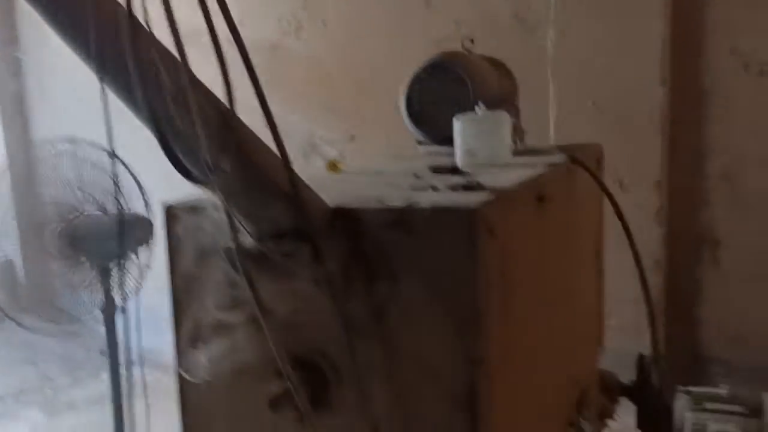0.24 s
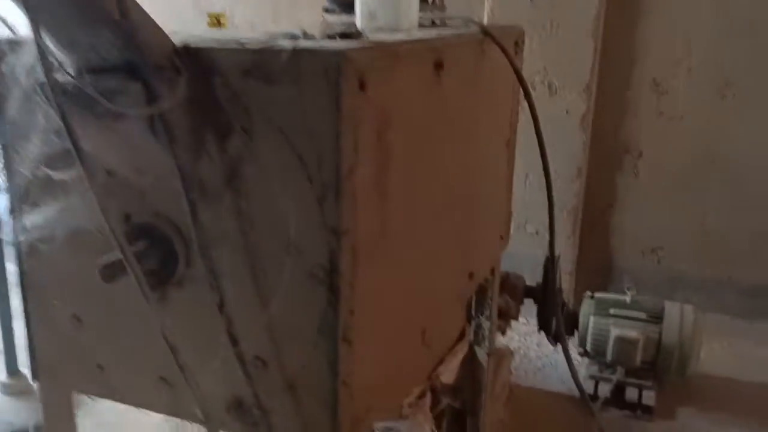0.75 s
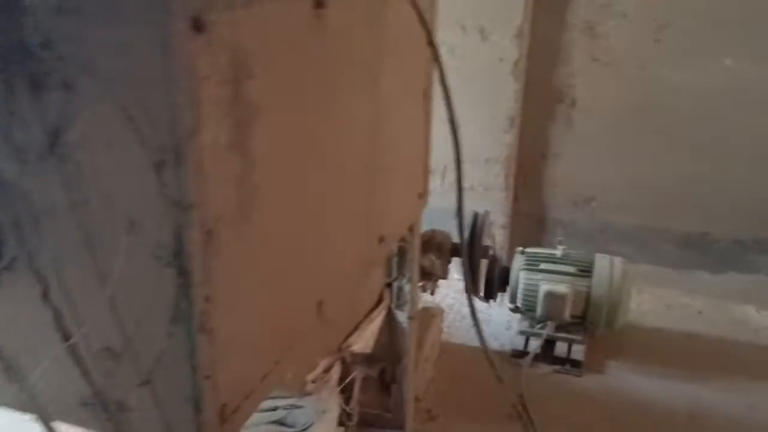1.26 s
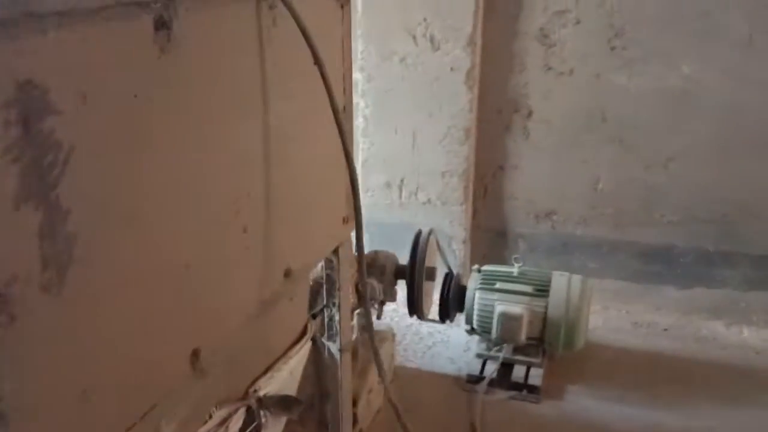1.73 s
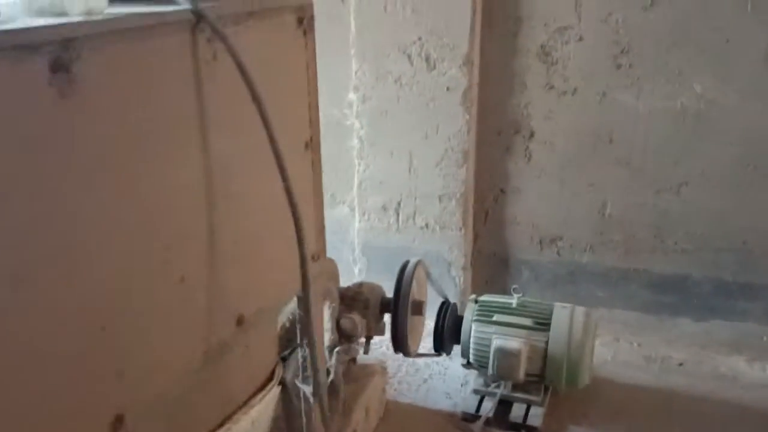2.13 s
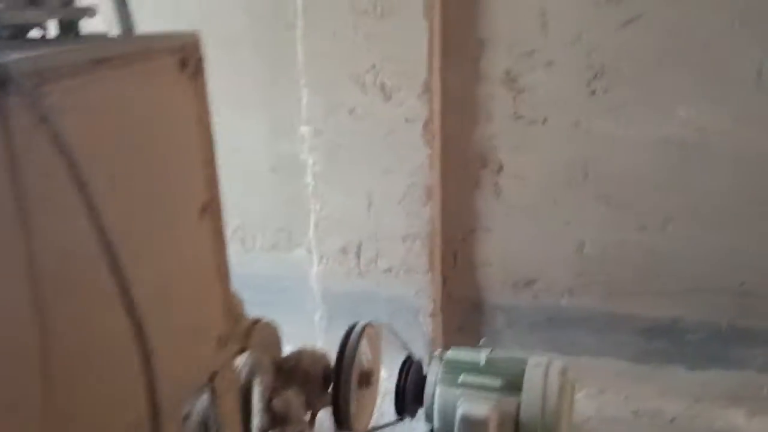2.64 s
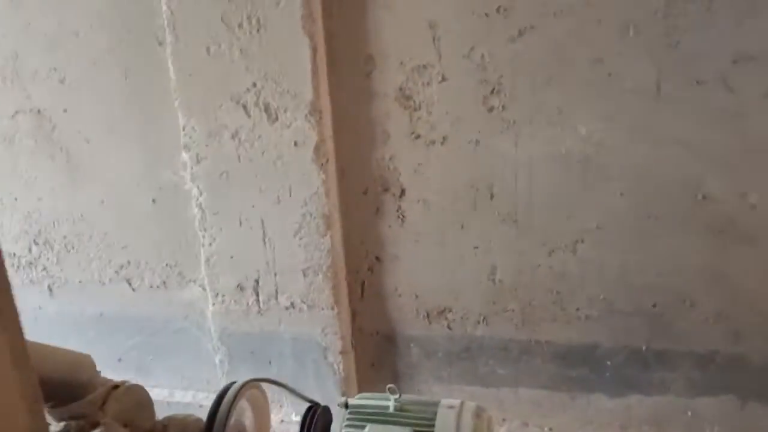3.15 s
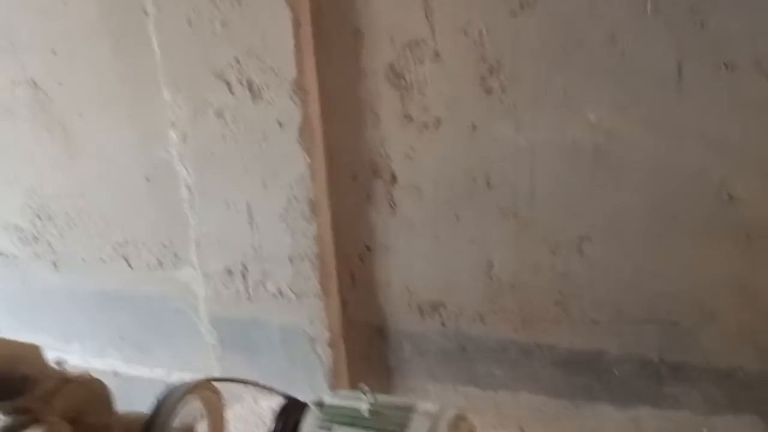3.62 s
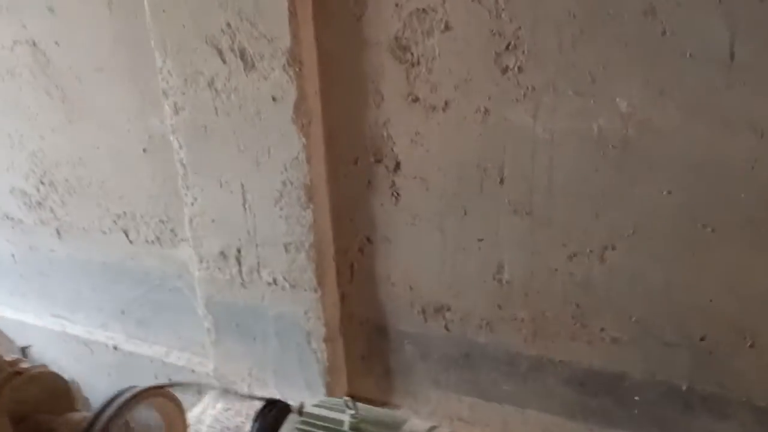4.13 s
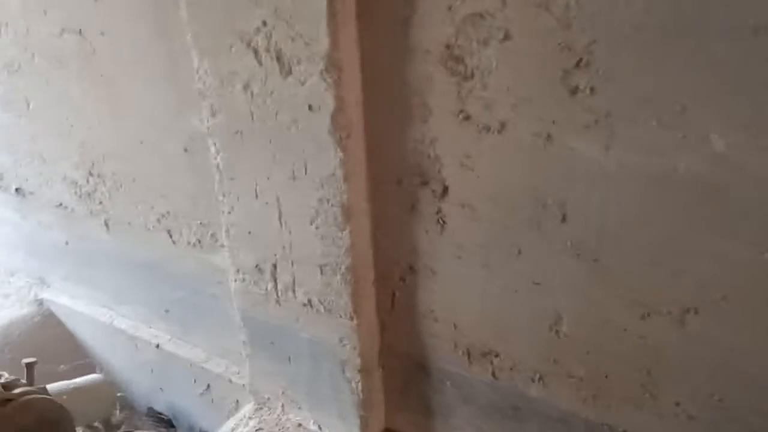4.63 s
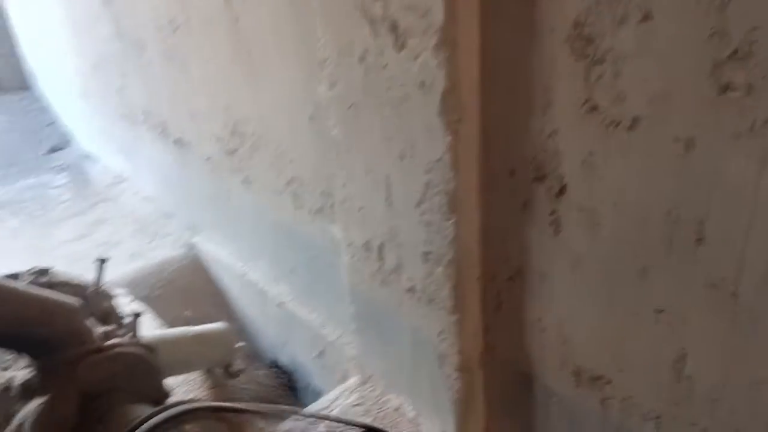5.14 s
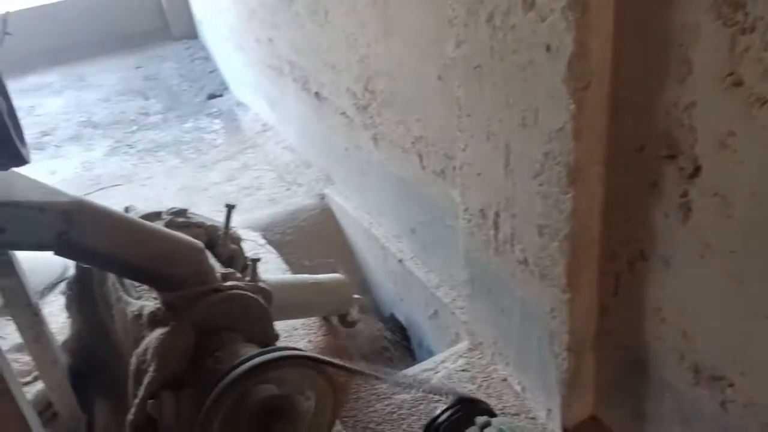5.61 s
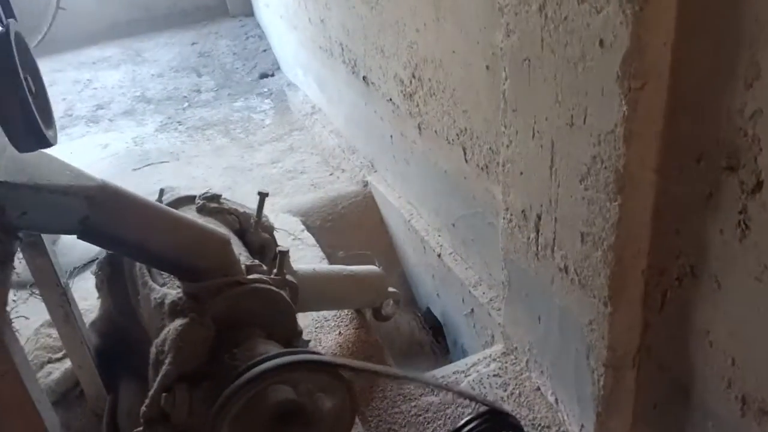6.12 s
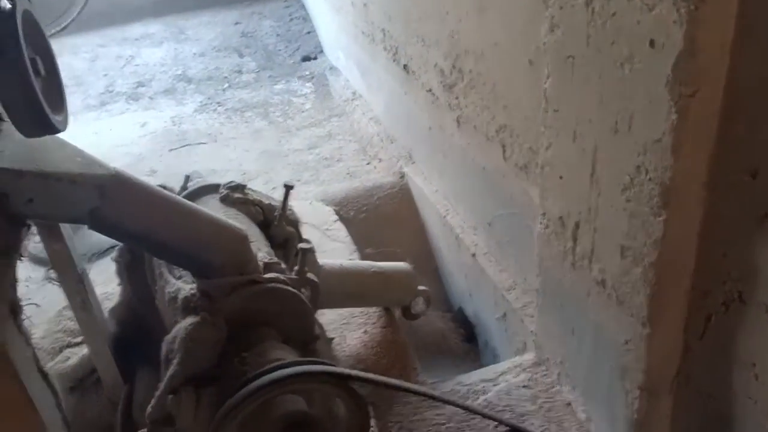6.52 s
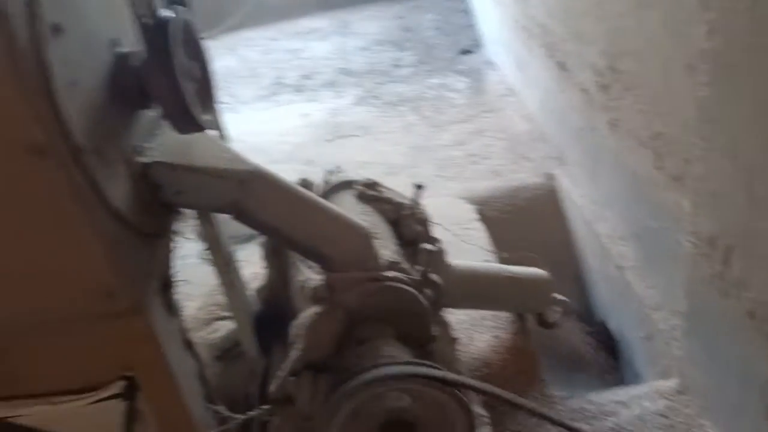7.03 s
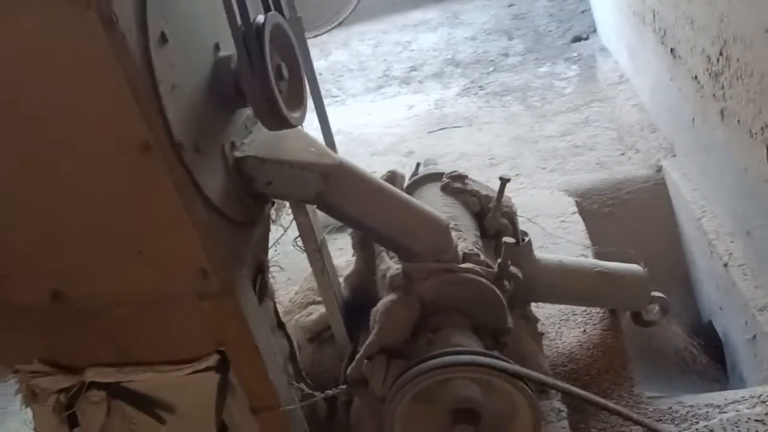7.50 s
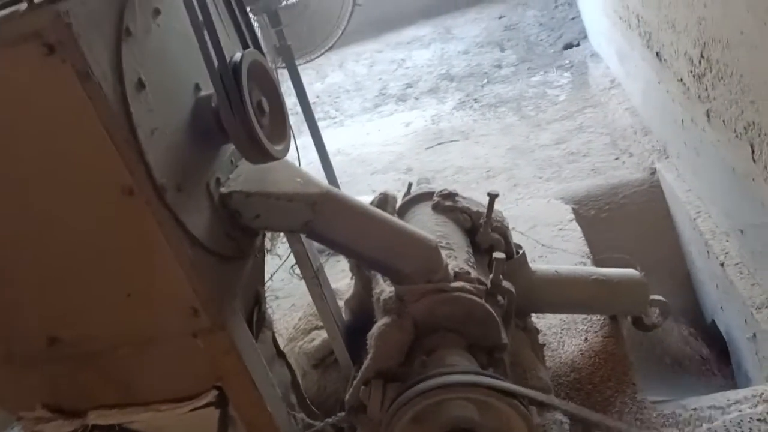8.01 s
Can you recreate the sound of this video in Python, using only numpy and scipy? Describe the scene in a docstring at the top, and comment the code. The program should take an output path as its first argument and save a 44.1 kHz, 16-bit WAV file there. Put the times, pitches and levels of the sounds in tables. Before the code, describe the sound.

A small grain mill runs steadily in a concrete workshop, a loud bright dense hiss over low belt rumble and a faint motor whine.

```python
"""Small grain mill in a concrete workshop

Grain sheared between the plates makes a dense bright hiss: noise and random cracks, coloured by each
microphone port, throbbing with the shaft. Below it frame, drum and belts rumble as low noise; drum, gears
and bearings hum as narrow noise, and the motor whines faintly as a sine. A hand turns the microphone pair slowly.
"""
import sys
import numpy as np
from scipy import signal
from scipy.fft import rfft, irfft, next_fast_len
from scipy.io import wavfile

SR = 44100
rng = np.random.default_rng(int(sys.argv[2]) if len(sys.argv) > 2 else 0)


def pcm_store(signal):
    """Save signal as 16-bit PCM."""
    levels = np.round(np.clip(np.atleast_2d(signal), -1, 1) * 32767)
    wavfile.write(sys.argv[1], SR, levels.astype(np.int16).T)


def ratio(d):
    """dB to gain"""
    e = np.asarray(d, float) / 20
    return 10 ** e


N = 364266

# Hand holding the microphone pair. Each row: time in seconds, nearness to the mill in dB,
# tilt of the left port in dB, opening of the left port in dB.
HAND = [(0.0, 0.9, 1, -2.4), (.4, -0.1, 0.3, -1), (1.0, -0.7, -2, -0.3), (1.5, 0.1, -3, -0.5),
        (2.2, 1.2, 0, 1.9), (2.8, 0.8, -0.5, -1.2), (3.4, 1.3, -.3, .7), (4.0, 0.6, -0.5, -1.5),
        (4.5, 1, .4, -.6), (5.0, 0, 1.3, -0.8), (6.1, -0.85, 1.5, 1), (6.8, -0.5, 0.5, 1.5),
        (7.4, -1.5, 0.1, 0), (8.26, -1.1, .3, 2)]


def rms_one(x):
    """Scale each channel to rms 1."""
    return x / np.sqrt(np.mean(x ** 2, axis=-1, keepdims=True) + 1e-20)


def in_time(rows):
    """Columns of a curve table, one value a sample."""
    time_s, *columns = np.transpose(rows)
    return [np.interp(np.arange(N) / SR, time_s, column) for column in columns]


def bumps(rows):
    """Bell-shaped swells and dips, in dB."""
    t = np.arange(N) / SR
    return sum(db * np.exp(-((t - centre_s) / half_s) ** 2) for centre_s, db, half_s in rows)


def bins():
    """Frequencies of the transform bins, in Hz."""
    return np.fft.rfftfreq(next_fast_len(N), 1 / SR)


def at_hz(points):
    """A (Hz, value) table read at every bin, along log frequency."""
    hz, value = np.transpose(points)
    return np.interp(np.log(bins() + 1), np.log(hz), value)


def band(spectrum, low_hz, high_hz):
    """One band as sound; its soft edges add up to one with the next band."""
    octaves = np.log2((bins() + 1) / [[low_hz], [high_hz]])
    rise = np.clip((octaves * 9 + 1) / 2, 0, 1)
    return irfft(spectrum * rise[0] * (1 - rise[1]))[..., :N]


def white(channels):
    """Spectrum of white noise at 0 dB per Hz."""
    return rfft(rng.standard_normal((channels, next_fast_len(N)))) * np.sqrt(SR / 2)


def drift(rate_hz):
    """Slow chance: noise through a double one-pole low-pass; spread 1."""
    hop = 40  # samples per slow step
    r = np.exp(-2 * np.pi * hop * rate_hz / SR)
    noise = rng.standard_normal(N // hop + 2002)
    slow = signal.lfilter([1], [1, -2 * r, r * r], noise)[2000:]  # settled part
    return np.interp(np.arange(N) / hop, np.arange(len(slow)), rms_one(slow))


def shaft_throb():
    """Once a turn the load peaks; the speed wanders and the beat varies in depth."""
    shaft_hz, wander_hz = 17.2, 0.38
    turns = np.cumsum(shaft_hz + wander_hz * drift(0.38)) / SR
    beat = np.cos(2 * np.pi * turns) + 0.3 * np.cos(4 * np.pi * turns)
    return beat * (1 + 0.2 * drift(0.87))


def rumble(throb, patchy_db, throb_db):
    """Frame, drum and belts: low noise, alike at both ports while the waves are long."""
    # Band edges in Hz.
    edges_hz = [18, 110, 330, 700, 1800]
    # Frame and belts. Each row: frequency in Hz, density in dB per Hz before lean and movement.
    frame_colour = [(22, -80), (35, -73), (50, -65), (65, -60), (95, -65.5), (130, -59.5), (178, -55.5),
                    (250, -57), (350, -58.5), (452, -55.5), (530, -57.5), (690, -62.5), (1000, -63.5),
                    (1500, -64.5), (1900, -59.5)]
    # Stereo lean. Each row: frequency in Hz, left minus right in dB.
    lean = [(60, -0.5), (250, -1), (450, -1.3), (700, 0), (1100, 2), (1800, 1.5)]
    # Likeness of the ports. Each row: frequency in Hz, shared share of power (0-1).
    likeness = [(30, 1), (250, .92), (430, 0.95), (600, 0.73), (780, 0.54), (950, 0.36), (1300, 0.23),
                (1900, 0.47)]
    # How each band follows the hand. Each row: dB per dB of nearness, dB per dB of tilt.
    follows = [(.3, 0.7), (1.5, 0.05), (1.05, .3), (0.86, .1)]
    left_late_s = 0.00022  # the right port is nearer

    alike = np.clip(at_hz(likeness), 0, 1)
    shared, left, right = white(channels=3)
    late = np.exp(-2j * np.pi * bins() * left_late_s)
    common = np.array([shared * late, shared])
    pair = np.sqrt(alike) * common + np.sqrt(1 - alike) * np.array([left, right])
    pair = pair * ratio(at_hz(frame_colour) + at_hz(lean) * [[0.5], [-0.5]])

    out = 0
    hand_db = np.dot(follows, in_time(HAND)[:2])
    for low_hz, high_hz, band_db in zip(edges_hz, edges_hz[1:], hand_db):
        level_db = band_db + patchy_db * drift(6.2) + throb_db * throb
        out = out + band(pair, low_hz, high_hz) * ratio(level_db)
    return out


def hums():
    """Drum, gears and bearings: noise in narrow resonances, wavering in level."""
    # Wavering tones. Each row: frequency in Hz, width in Hz, rms in dB before movement.
    tones = [(64, 10, -58), (177.1, 6.7, -45.5), (454, 20, -54), (562, 6.2, -51), (880, 5.5, -57),
             (910, 7.2, -57), (938, 8, -54.5)]
    # Drum hum swelling and sinking at a few moments. Each row: centre in seconds, change in dB,
    # half length in seconds.
    swells = [(.05, 3.5, 0.32), (1.05, 5, .3), (2.25, 5, 0.29), (4.55, 2, .45), (5.7, -4, .25)]
    drum_row = 1
    near_db = 1.7 * in_time(HAND)[0]  # dB per dB of nearness
    swell_db = bumps(swells)
    out = 0
    for k, ((hum_hz, width_hz, hum_db), noise) in enumerate(zip(tones, white(channels=len(tones)))):
        peak = 1 / (1 + ((bins() - hum_hz) / (width_hz / 2)) ** 2)
        level_db = hum_db + near_db + swell_db * (k == drum_row) + 1.6 * drift(1.3)
        out = out + ratio(level_db) * rms_one(irfft(noise * peak)[:N])
    return out


def motor_whine():
    """Sine wavering in pitch and level, coming through in spells."""
    # Spells. Each row: start in seconds, end in seconds, rms in dB before the floor and waver.
    spell_rows = [(0, .45, -52), (2.15, 2.4, -49), (3.3, 4.25, -47.5), (4.6, 4.95, -50), (5.1, 5.4, -50),
                  (5.6, 5.85, -47), (6.5, 7.2, -54)]
    whine_hz, fade_s, between_db = 1212, 0.044, -60
    t = np.arange(N) / SR
    phase = 2 * np.pi * np.cumsum(whine_hz + 1.5 * drift(3.9)) / SR
    gain = ratio(between_db)
    for start_s, end_s, db in spell_rows:
        inside_s = np.minimum(t - start_s, end_s - t)
        gain = gain + ratio(db) * np.clip(inside_s / fade_s + 1, 0, 1)  # fades lie outside the spell
    return np.sqrt(2) * gain * ratio(1.7 * drift(4.1)) * np.sin(phase)


def feed(uneven_db):
    """The grain flows unevenly: a random waver and a few marked swells and dips, in dB."""
    # Brief swells and dips. Each row: centre in seconds, change in dB, half length in seconds.
    surges = [(.62, -.8, .04), (.9, -1, 0.036), (1.564, 1, 0.036), (2.83, -1.5, 0.038), (3.46, 1, .05),
              (4.0, .8, 0.035), (4.66, -0.7, .04), (4.85, 1.2, 0.055), (7.76, 0.5, .04), (7.99, 1, 0.025)]
    return uneven_db * drift(15.0) + bumps(surges)


def hiss(throb, feed_db, crack_share, patchy_db, throb_db):
    """Grains crack too densely to count; the room scatters them, so each port gets its own crowd."""
    # Band edges in Hz.
    edges_hz = [1800, 4100, 5000, 6500, 9500, 13200, 17000]
    # Hiss through the left port. Each row: frequency in Hz, density in dB per Hz before cavity and movement.
    left_colour = [(1800, -60), (2100, -61), (2600, -54), (3300, -51), (3900, -53.2), (4550, -48.5),
                   (5000, -50.5), (5680, -46), (6400, -56), (8600, -55.5), (9500, -56), (10750, -51.5),
                   (12000, -58.5), (13400, -60), (15200, -67.5)]
    # Hiss through the right port. Each row: frequency in Hz, density in dB per Hz before movement.
    right_colour = [(1800, -72.5), (2100, -61.3), (2500, -58), (3100, -57.5), (3900, -59.5), (4500, -57),
                    (5500, -57), (6800, -56), (9000, -56), (10000, -61.5), (11800, -57.4), (13200, -58.5),
                    (14300, -58.5), (15200, -58)]
    # How each band at the left port follows the hand. Each row: dB per dB of nearness, of tilt, of opening.
    left_follows = [(0.7, -0.23, 0.1), (-.05, -0.5, .4), (-0.7, 0.07, 0.21), (0.1, 0.5, 0.5),
                    (0.45, 0.84, -.05), (0, .2, -.3)]
    # The same at the right port. Each row: dB per dB of nearness, of tilt, of opening.
    right_follows = [(1.6, -.2, .02), (.9, -.2, -.02), (1, .02, -.1), (.9, .1, .1), (1.3, 0.35, -.02),
                     (1.4, .3, -.03)]
    grains_per_s = 9000
    cavity_hz, cavity_width_hz, cavity_db = 5470, 170, 0.5  # the left port rings narrowly

    size = (2, next_fast_len(N))
    struck = rng.random(size) < grains_per_s / SR
    cracks = rms_one(rng.standard_normal(size) * struck)
    share = np.clip(crack_share, 0, 1)
    crowd = np.sqrt(1 - share) * white(channels=2) + np.sqrt(share * SR / 2) * rfft(cracks)
    crowd = crowd * ratio([at_hz(left_colour), at_hz(right_colour)])
    ring = 1 / (1 + ((bins() - cavity_hz) / (cavity_width_hz / 2)) ** 2)
    crowd[0] *= 1 + (ratio(cavity_db) - 1) * ring

    out = 0
    hand_db = np.dot([left_follows, right_follows], in_time(HAND))
    for k, (low_hz, high_hz) in enumerate(zip(edges_hz, edges_hz[1:])):
        flutter_db = patchy_db * np.array([drift(6.0), drift(18.0)])  # left, right
        level_db = hand_db[:, k] + feed_db + flutter_db + throb_db[k] * throb
        out = out + band(crowd, low_hz, high_hz) * ratio(level_db)
    return out


def scene():
    """Rumble and hiss share the throb of one shaft; hums and whine join them."""
    throb = shaft_throb()
    low = rumble(throb, patchy_db=0.36, throb_db=0.64)
    tones = hums() + motor_whine()
    high = hiss(throb, feed(uneven_db=0.3), crack_share=0.058, patchy_db=0.23,
                throb_db=[0.17, 0.18, 0.27, 0.59, 0.57, 0.5])
    return low + tones + high


def low_pass(x):
    """Removes everything above the highest recorded frequency."""
    return signal.sosfilt(signal.butter(12, 16100, fs=SR, output="sos"), x)


def record(dry):
    """The top is cut steeply and peaks are clipped at full scale."""
    cutoff_hz = 15440
    steep = signal.ellip(14, 0.3, 85, cutoff_hz, fs=SR, output="sos")  # ripple, stopband in dB
    mix = np.clip(signal.sosfilt(steep, dry), -1, 1)
    return low_pass(mix)


dry = scene()
out = record(dry)
pcm_store(out)
```